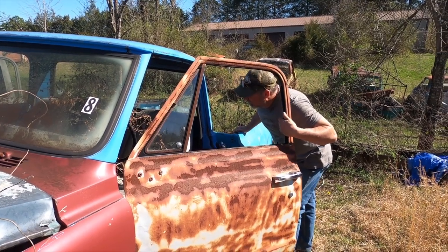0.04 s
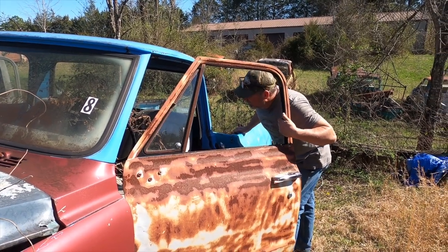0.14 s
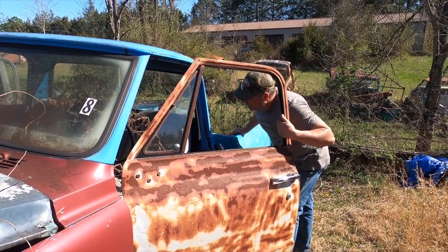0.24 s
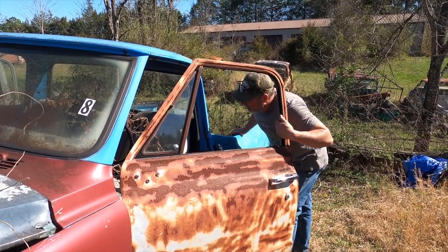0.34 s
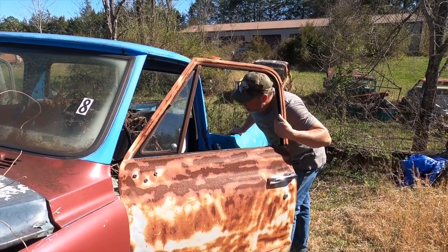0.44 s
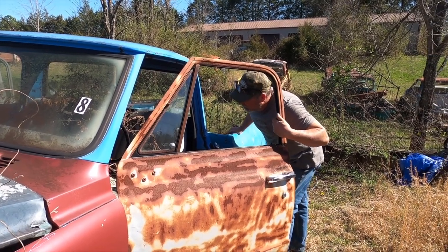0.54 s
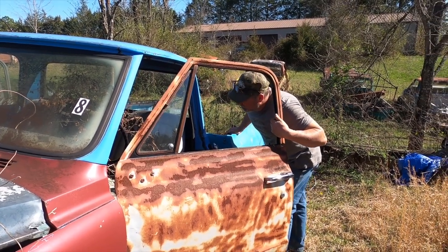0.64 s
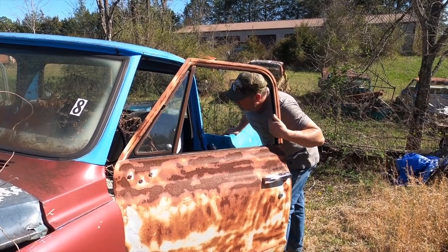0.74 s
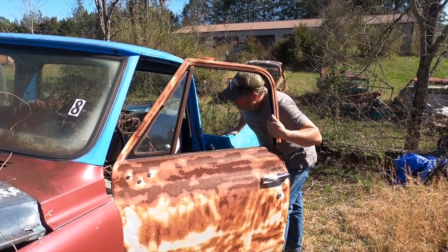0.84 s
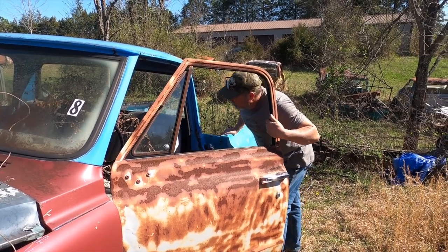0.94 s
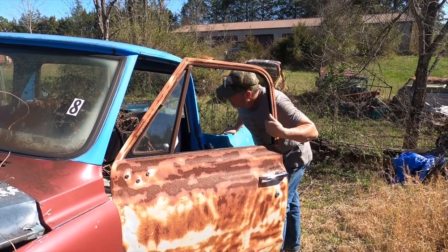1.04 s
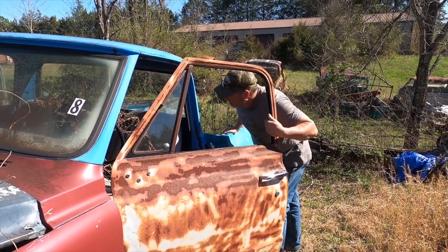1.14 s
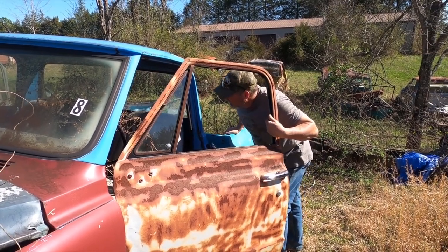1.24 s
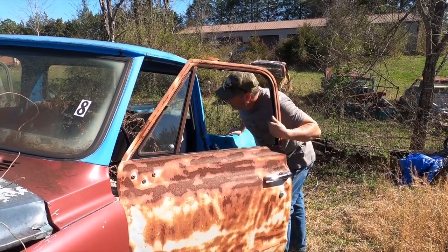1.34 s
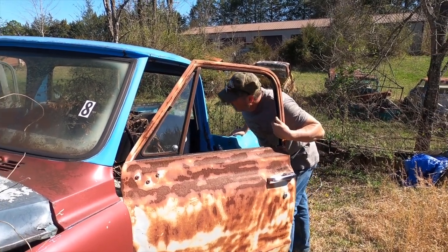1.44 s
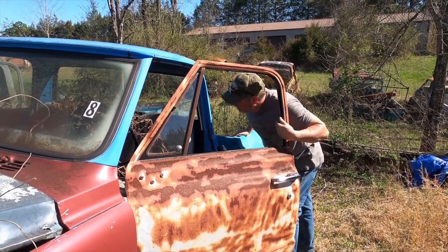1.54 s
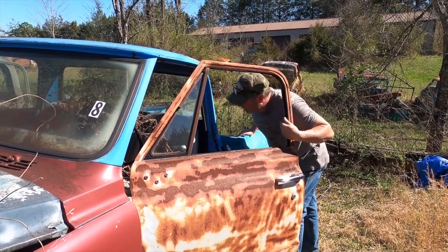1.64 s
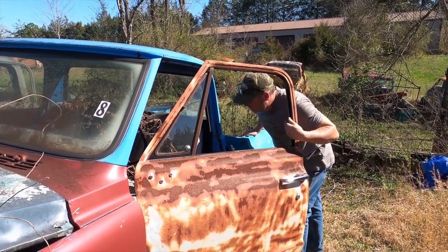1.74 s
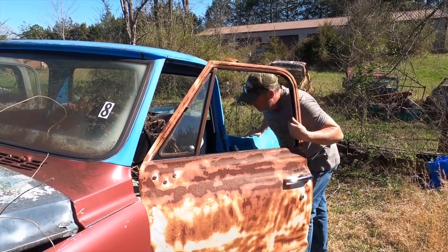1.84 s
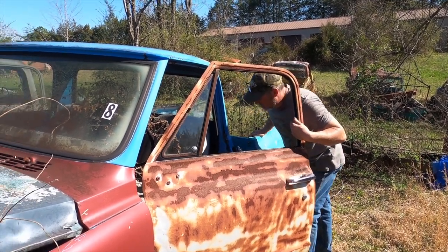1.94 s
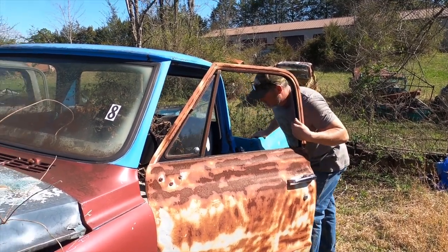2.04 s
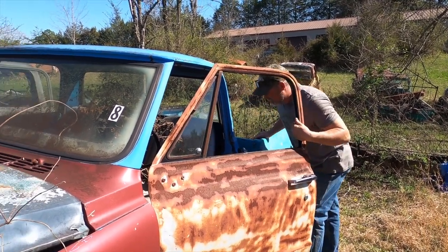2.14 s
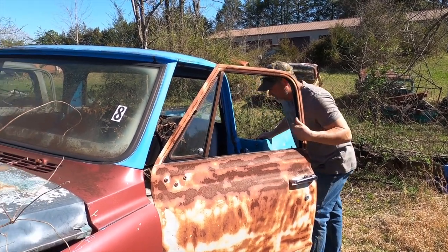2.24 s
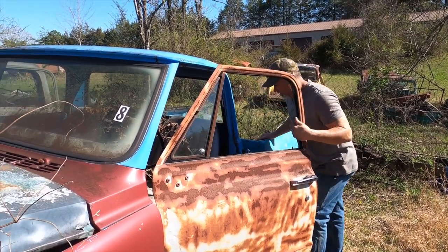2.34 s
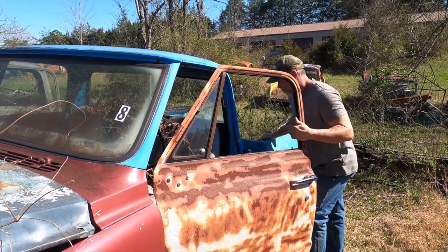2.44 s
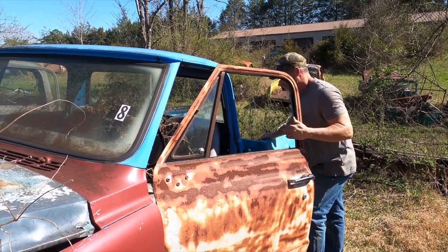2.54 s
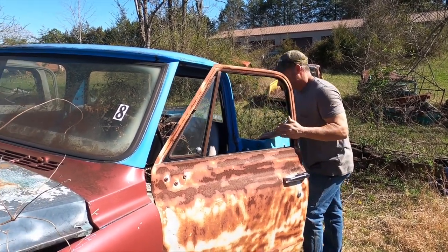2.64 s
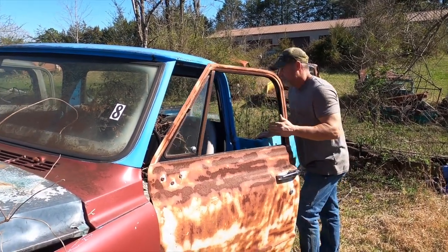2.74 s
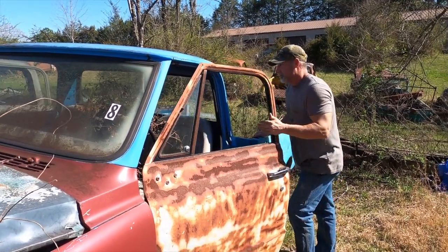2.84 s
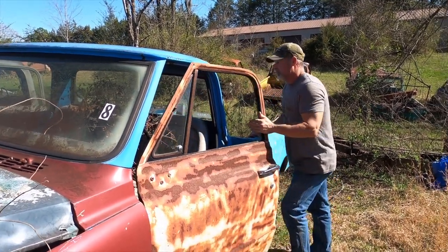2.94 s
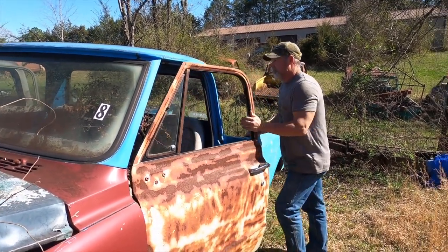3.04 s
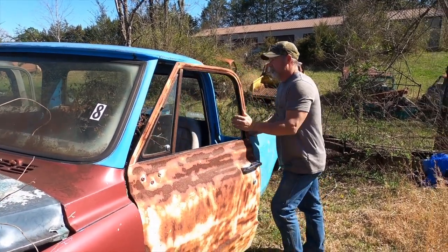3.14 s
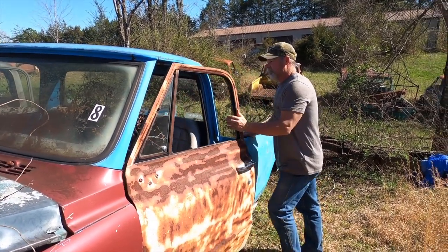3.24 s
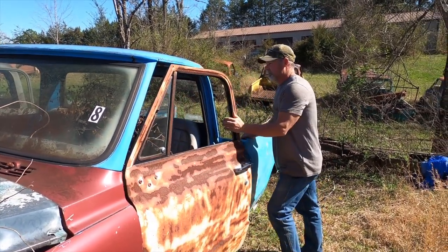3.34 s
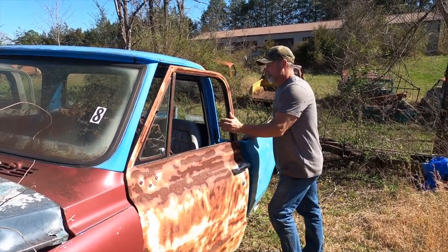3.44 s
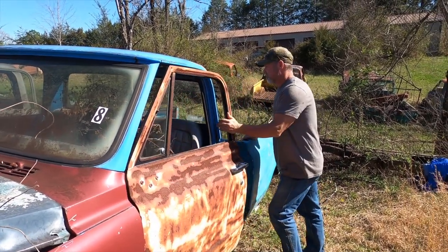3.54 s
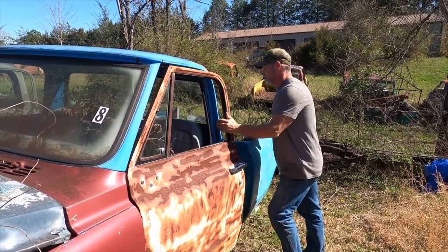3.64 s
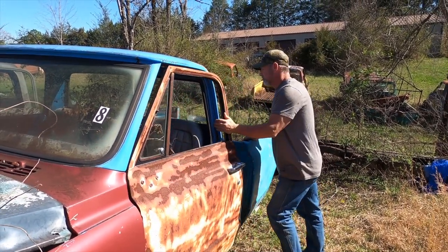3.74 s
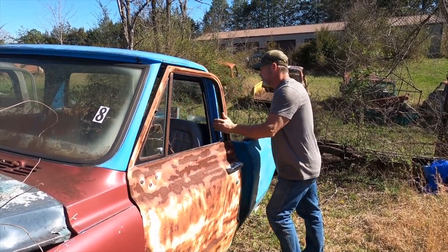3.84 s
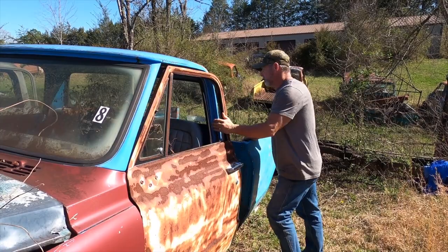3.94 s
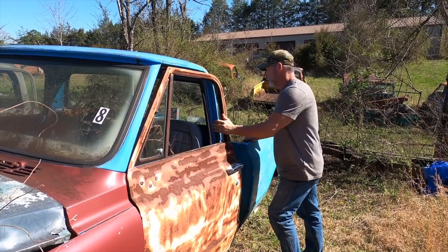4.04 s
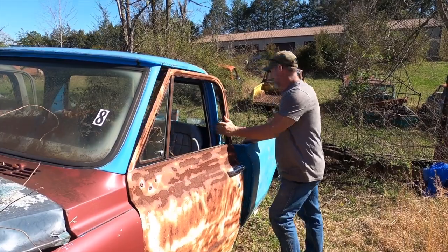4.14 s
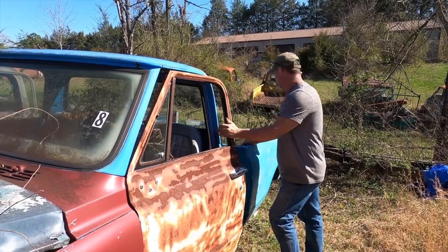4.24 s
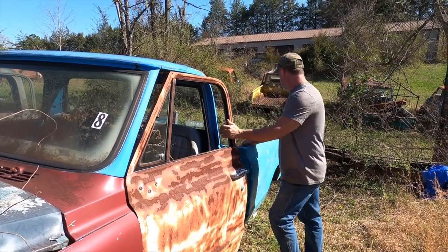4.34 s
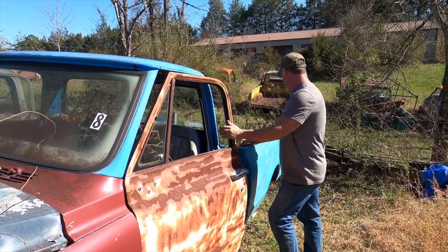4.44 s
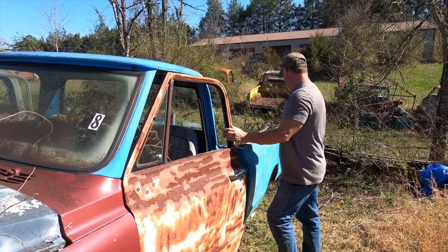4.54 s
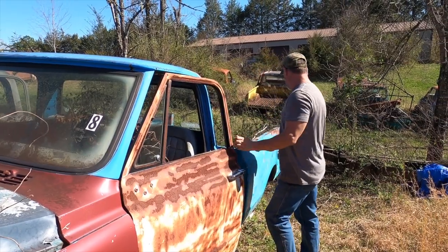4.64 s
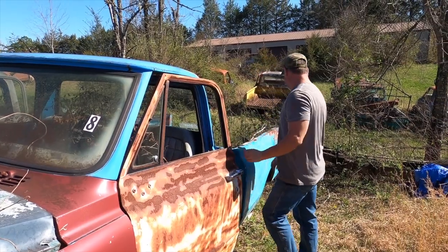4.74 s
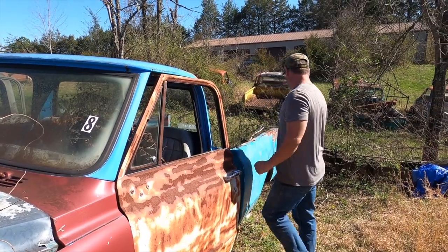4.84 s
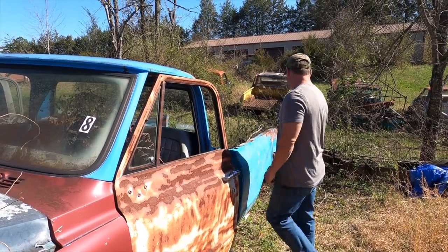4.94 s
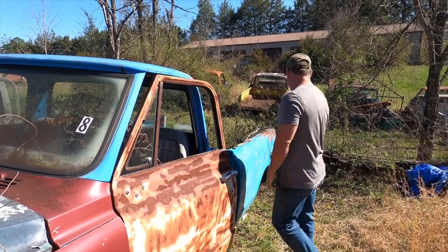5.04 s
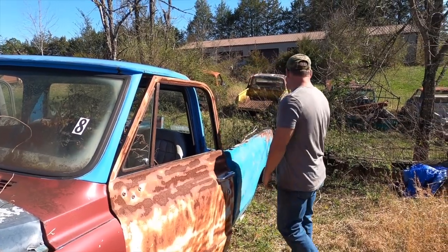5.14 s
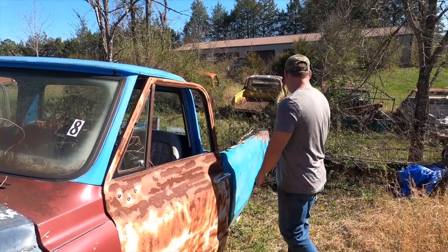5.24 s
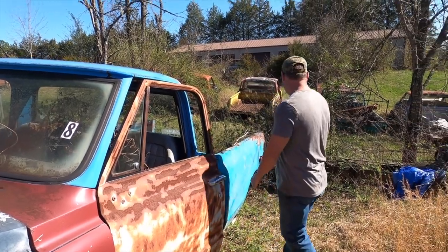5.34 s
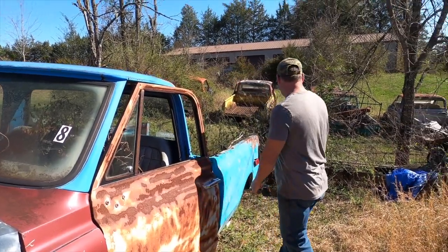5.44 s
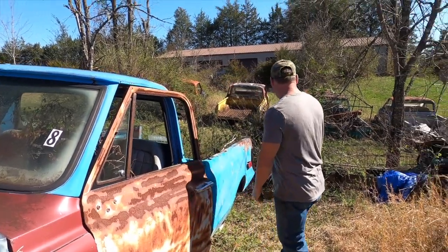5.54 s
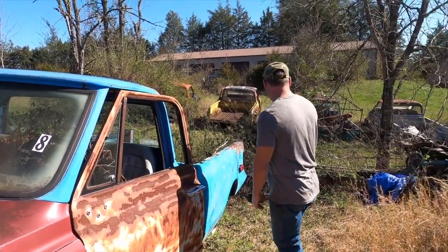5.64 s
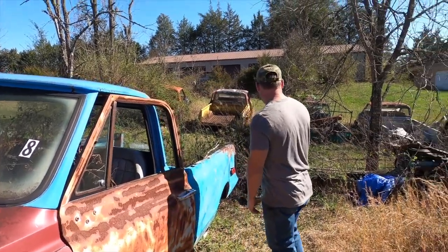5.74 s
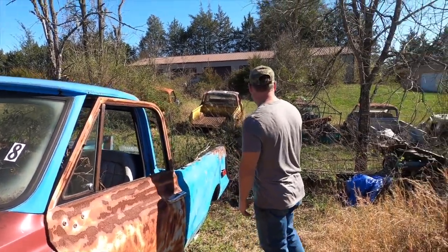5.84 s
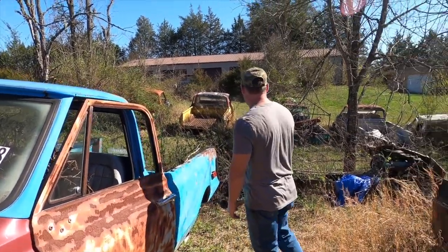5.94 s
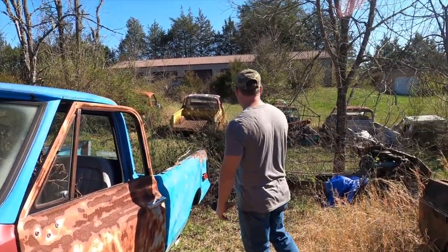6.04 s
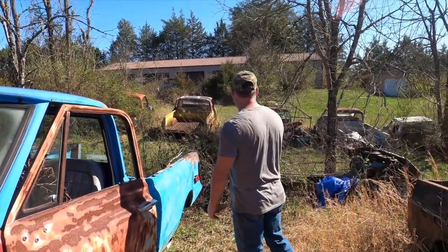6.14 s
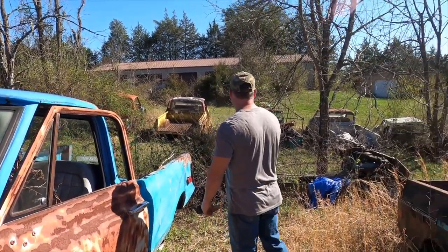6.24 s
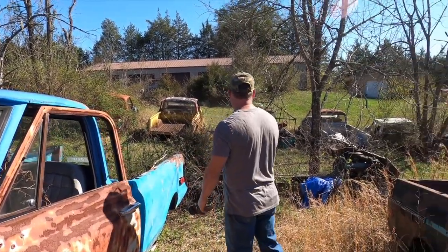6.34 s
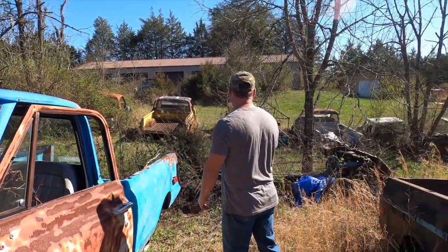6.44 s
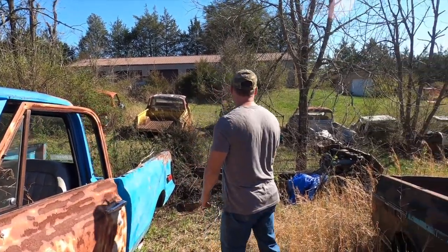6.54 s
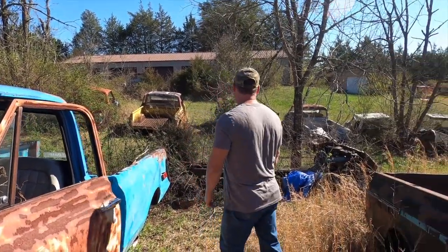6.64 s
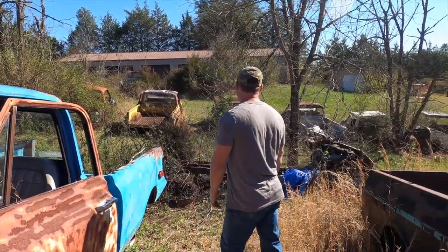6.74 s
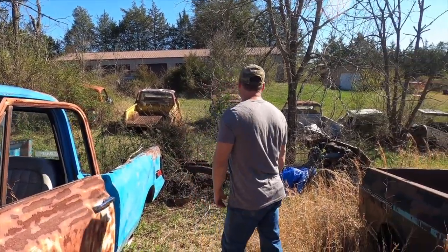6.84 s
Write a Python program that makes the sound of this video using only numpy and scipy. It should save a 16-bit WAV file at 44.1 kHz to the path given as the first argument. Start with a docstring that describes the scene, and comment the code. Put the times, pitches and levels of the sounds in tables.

```python
"""Rusty truck door in an overgrown yard

Wind rumbles on the microphone and an engine throbs far off: shaped noise, and harmonics that beat.
Low tones glide and moan; dry grass swishes: patchy noise, crackling ticks and single snaps.
A piece of metal clanks in the cab, the hinge groans in gliding tones, then a rusty steel door bumps
its frame, slams and rattles: each blow excites decaying modes. A faint whistle and hiss are filtered noise."""
import sys
import numpy as np
from scipy import signal
from scipy.fft import rfft, irfft
from scipy.io import wavfile
from scipy.ndimage import uniform_filter1d

SR = 44100
rng = np.random.default_rng(int(sys.argv[2]) if len(sys.argv) > 2 else 0)


def dump(signal):
    """Clip the signal to [-1, 1] and save it as 16-bit WAV at the path in sys.argv[1]."""
    limited = np.clip(np.atleast_2d(signal).T, -1, 1)
    pcm = np.round(limited * 32767).astype(np.int16)
    wavfile.write(sys.argv[1], SR, pcm)


N = 304290
T = np.arange(N) / SR


def amp(db):
    """Decibel law: a level in dB becomes an amplitude ratio."""
    return 10 ** (np.asarray(db) / 20)


def unit_rms(x):
    """Normalization: scales a signal to a root mean square of one."""
    return x / np.sqrt(np.mean(x ** 2) + 1e-20)


def read_curve(points, hz):
    """Logarithmic frequency scale: reads a curve of (Hz, value) between its points."""
    f, value = np.transpose(points)
    return np.interp(np.log(hz + 1), np.log(f + 1), value)


def columns(rows, t):
    """Linear interpolation: every column after the first (time) becomes a curve over t."""
    s, *rest = np.transpose(rows)
    return [np.interp(t, s, column) for column in rest]


def add(mix, start_s, sound):
    """Superposition: adds a sound to the mix in place, cut at the end."""
    part = mix[round(start_s * SR):][:len(sound)]
    part += sound[:len(part)]


def coloured(x, gain_db):
    """Linear filtering: multiplies the spectrum by a gain given as a function of Hz."""
    gain = amp(gain_db(np.fft.rfftfreq(len(x), 1 / SR)))
    return irfft(rfft(x) * gain, len(x))


def resonate(x, hz, width_hz):
    """Heterodyne resonance: shifts hz to zero, smooths twice by a pole of width_hz, and shifts back."""
    turn = np.exp(2j * np.pi * np.cumsum(hz * np.ones(len(x))) / SR)
    pole = np.exp(-np.pi * width_hz / SR)
    low = x / turn
    for _ in range(2):
        low = signal.lfilter([1 - pole], [1, -pole], low)
    return 2 * (turn * low).real


def field(level_db, length, size, patchy_db, drift_db=0.):
    """Short-time spectrum: noise shaped by level_db(Hz, s), with small patches and a slower drift of colour."""
    hop = size // 4
    t = np.arange(length // hop + 5) * hop / SR
    hz = np.fft.rfftfreq(size, 1 / SR)
    a, b, patches, drift = rng.standard_normal((len(t), len(hz), 4)).T
    patches = unit_rms(uniform_filter1d(uniform_filter1d(patches, size=6, axis=0), size=8, axis=1))
    drift = unit_rms(uniform_filter1d(uniform_filter1d(drift, size=8, axis=0), size=60, axis=1))
    z = (a + 1j * b) * amp(level_db(hz[:, None], t[None]) + patchy_db * patches + drift_db * drift)
    return signal.istft(z, nperseg=size, noverlap=size - hop)[1][:length]


def glide(start_s, length_s, db, first_hz, last_hz, waver_hz, ends_db):
    """Frequency modulation: a sliding tone, loudest in the middle, its pitch wavering by waver_hz rms."""
    u = np.arange(0, 1, 1 / (length_s * SR))
    waver = unit_rms(uniform_filter1d(rng.standard_normal(len(u)), size=800))
    hz = first_hz + (last_hz - first_hz) * u + waver_hz * waver
    swell = amp(db + ends_db * (2 * u - 1) ** 2) * signal.windows.tukey(len(u), .2)
    return start_s, np.sqrt(2) * swell * np.sin(2 * np.pi * np.cumsum(hz) / SR)


def swells(rows, t, rise_db_per_s, fall_db_per_s):
    """Energy summation, in dB, of swells (start s, length s, dB) that rise, hold for their length and fall."""
    s, length, db = np.transpose(rows)[:, :, None]
    before = (s - t) * rise_db_per_s
    after = (t - s - length) * fall_db_per_s
    below = np.maximum(np.maximum(before, after), 0)
    return 10 * np.log10((amp(db - below) ** 2).sum(0) + 1e-20)


# wind on the microphone: time [s], rumble_level [dB], roar_level [dB]
WIND = [(0.0, -20.5, -47.5), (0.19, -23, -47.5), (0.38, -22, -43), (0.68, -28, -48), (1.05, -22.5, -49.5),
        (1.95, -23, -50), (2.27, -23, -38), (2.4, -24.5, -44.5), (2.55, -21.5, -40), (2.85, -28, -45.5),
        (3.25, -25.5, -49.5), (3.8, -24.5, -48), (4.25, -26, -44), (4.6, -27, -49), (5.1, -27, -52),
        (5.5, -30, -48.5), (5.9, -27.5, -50), (6.34, -32, -53.5), (6.9, -40.5, -51)]
# relative spectrum of the rumble: frequency [Hz], density [dB per Hz]
RUMBLE = [(12, -57.5), (20, -16), (34, -30.5), (50, -11.5), (64, -9), (86, 0), (103, -2.5), (132, -15),
          (152, -16), (171, -33), (193, -29), (214, -34), (260, -44.5), (340, -74), (570, -120)]
# relative spectrum of the roar: frequency [Hz], density [dB per Hz]
ROAR = [(120, -27.5), (200, 10), (238, -19), (317, -1.5), (378, -11), (750, -19.5), (1270, -19.5),
        (1950, -36), (2250, -39.5), (4540, -55.5), (9000, -83), (11700, -85.5), (19800, -120)]


def wind():
    """Broadband flow noise: a low rumble under a faint roar."""
    rumble_db, roar_db = columns(WIND, T)
    rumble = field(lambda hz, t: read_curve(RUMBLE, hz) + 0 * t, N, size=4096, patchy_db=1.9)
    roar = field(lambda hz, t: read_curve(ROAR, hz) + 0 * t, N, size=1024, patchy_db=2.0)
    return amp(rumble_db) * unit_rms(rumble) + amp(roar_db) * unit_rms(roar)


# low gliding moans, perhaps an engine revving far off:
# start [s], length [s], level at the middle [dB], first_pitch [Hz], last_pitch [Hz]
LOW_MOANS = [(0.122, 0.27, -20, 95.3, 133.1), (2.239, 0.28, -18.5, 96.5, 138),
             (5.945, 0.391, -24, 125.6, 71), (6.5, 0.49, -50, 200.3, 215)]


def low_moans():
    """Gliding oscillation: low moans slide in pitch, perhaps an engine revving far off."""
    out = np.zeros(N)
    for row in LOW_MOANS:
        add(out, *glide(*row, waver_hz=5.2, ends_db=-24.5))
    return out


# an engine idles some way off: time [s], level [dB]
ENGINE = [(0, -41), (.6, -39.5), (.95, -26), (1.8, -27.5), (2.3, -29), (2.8, -36), (3.3, -23), (4.2, -25.5),
          (4.7, -23.5), (5.4, -22), (5.9, -20.5), (6.3, -34.5), (6.9, -46)]
# its harmonics: order [multiple of the cycle rate], relative level [dB]
ORDERS_DB = [(5, -19), (7, -13), (8, -16), (9, -9), (10, 0), (11, 0), (12, -11), (13, -11), (14, -14),
             (15, -13), (16, -15)]
CYCLES_PER_S, THROB_AT_S = 8.0, 5.324
WANDER_RAD, WANDER_DB = 0.28, 3  # rms drift of each harmonic
SMEAR_RAD = .7  # phase spread, times the squared distance from the mean order


def engine():
    """Beating of harmonics: multiples of a slow cycle form a soft throb, each wandering a little."""
    order, db = np.transpose(ORDERS_DB)[:, :, None]
    t, slow = T[::20], T[::1000]
    drift = uniform_filter1d(rng.standard_normal((2, len(order), len(slow))), size=14, axis=2)
    turn, swell = np.array([[np.interp(t, slow, unit_rms(row)) for row in rows] for rows in drift])
    phase = 2 * np.pi * order * CYCLES_PER_S * (t - THROB_AT_S)
    phase += SMEAR_RAD * (order - order.mean()) ** 2 + WANDER_RAD * turn
    harmonics = amp(db + WANDER_DB * swell) * np.cos(phase)
    tones = signal.resample_poly(harmonics.sum(0), 20, 1)[:N]
    return amp(columns(ENGINE, T)[0]) * unit_rms(tones)


# the grass stirs faintly all the time: time [s], level [dB]
STIR = [(0, -87), (1.0, -91), (1.2, -69), (1.5, -85), (2.0, -87.5), (2.4, -76), (2.75, -75), (3.15, -68.5),
        (3.45, -71.5), (3.75, -76), (4.3, -69), (4.7, -73), (6.9, -62.5)]
# legs drag through the grass: start [s], length [s], level [dB]
STRIDES = [(4.77, .08, -58.5), (4.87, .12, -57), (5.08, 0.4, -54.5), (5.57, 0.1, -60), (5.7, .31, -56.5),
           (6.1, .19, -54.5), (6.36, .42, -55)]
# short rustles in the grass, and later the crunches of footfalls: time [s], level [dB]
RUSTLES = [(.04, -73.5), (.13, -73), (.18, -74), (0.271, -70), (0.921, -69.5), (1.012, -73.5), (1.16, -66),
           (1.51, -76), (1.57, -73), (1.86, -71), (2.041, -64.5), (2.411, -71), (2.798, -69), (2.87, -68),
           (4.341, -66.5), (4.531, -60), (4.8, -53.5), (5.12, -52), (5.42, -52), (5.52, -54), (5.81, -55),
           (5.991, -57), (6.26, -54), (6.595, -52), (6.62, -47), (6.642, -51.5), (6.668, -49),
           (6.86, -57.5)]


def grass_db(t):
    """Energy summation: the powers of faint stirring, strides, short rustles and footfalls add up."""
    strides = swells(STRIDES, t, rise_db_per_s=156.5, fall_db_per_s=197)
    rustle_rows = [(s, 0, db) for s, db in RUSTLES]
    rustles = swells(rustle_rows, t, rise_db_per_s=396, fall_db_per_s=497)
    return 10 * np.log10(amp(columns(STIR, t)[0]) ** 2 + amp(strides) ** 2 + amp(rustles) ** 2)


# relative spectrum of the swish: frequency [Hz], density [dB per Hz]
SWISH = [(530, -23), (900, -1), (1130, -8), (1430, -7.5), (2150, -11.5), (2450, -11.5), (3400, -12),
         (3950, -10), (4500, -12.5), (5000, -12), (6000, -14.5), (7680, -15.5), (8550, -12.5), (9510, -18),
         (12200, -20.5), (15500, -33.5)]
# pitches of small stalks: pitch [Hz]
CRACKLE_HZ = [1500, 2350, 3030, 4000, 4950, 5970, 8450, 10500, 12300]
# stalks that snap: start [s], level [dB], pitch [Hz]
SNAPS = [(1.148, -66, 3780), (1.8497, -71, 3700), (2.022, -63.5, 4240), (2.042, -57, 3700),
         (3.296, -56, 3510), (4.339, -49, 4830), (4.3977, -65, 3500), (5.0754, -43, 5820),
         (5.119, -33.5, 2450), (5.208, -51, 4070), (5.425, -44, 3700), (5.469, -45, 4950),
         (5.684, -52, 4530), (5.7915, -46, 6550), (6.4712, -42, 5350), (6.585, -42, 4600),
         (6.5934, -32, 4900), (6.603, -41, 4300), (6.613, -25.5, 4670), (6.625, -36, 5170),
         (6.6388, -28, 4500), (6.647, -39, 3200), (6.655, -22.5, 4840), (6.665, -39, 4300),
         (6.7171, -35, 4100), (6.786, -39, 4540), (6.857, -37, 4400)]
SNAP_T60_S = 0.015
CRACKLE_DB, CRACKLE_PER_DB = -4, 0.14  # share of crackle at -52 dB; softer grass crackles less


def random_ticks(spread_db, ticks_per_s):
    """Poisson-like impulses: sparse random ticks of exponentially spread level."""
    return amp(spread_db * np.minimum(rng.exponential(1, N), 5)) * (rng.random(N) < ticks_per_s / SR)


def grass():
    """Friction noise and brittle fracture: a patchy swish, duller when soft, with crackle and single snaps."""
    slow = T[::64]
    level_db = grass_db(slow)

    def swish_db(hz, t):
        now_db = np.interp(t, slow, level_db)
        dull = 0.78 * np.minimum(now_db + 51.5, 0) * np.log2(np.maximum(hz, 6000.) / 5600.0)
        # the low part swells less
        steady = -.8 * np.maximum(now_db + 55.0, 0) / (1 + (hz / 920.0) ** 6)
        return read_curve(SWISH, hz) + dull + steady

    swish = unit_rms(field(swish_db, N, size=512, patchy_db=2.0, drift_db=2.0))
    ticks = random_ticks(4.1, 1500.) * rng.choice([-1, 1], N)
    stalk = rng.integers(0, len(CRACKLE_HZ), N)
    crackle = np.zeros(N)
    for k, hz in enumerate(CRACKLE_HZ):
        crackle += amp(read_curve(SWISH, hz)) * resonate(ticks * (stalk == k), hz, 970.0)
    crackle = unit_rms(crackle)
    # the finest stalks tick
    crackle += amp(-13.5) * unit_rms(resonate(random_ticks(4.5, 400.), 9600.0, 5000.))
    now_db = np.interp(T, slow, level_db)
    out = amp(now_db) * (swish + amp(CRACKLE_DB + CRACKLE_PER_DB * (now_db + 52.0)) * crackle)
    t = T[:4000]
    for s, db, hz in SNAPS:
        noise = rng.standard_normal(len(t))
        snap = unit_rms(resonate(noise, hz, 1200.0))
        snap += amp(-9.5) * coloured(noise, lambda f: -2.5 * f / 1000)
        add(out, s, amp(db - 60 * t / SNAP_T60_S) * snap * (1 - np.exp(-t / 0.0015)))
    return out


# a fuzzy whistle swells now and then: start [s], length [s], level [dB], pitch [Hz]
WHISTLES = [(4.688, 0.14, -61, 1440), (5.104, 0.015, -52.5, 1430), (5.227, .02, -57, 1390),
            (5.37, 0.08, -56, 1564), (5.759, 0.024, -55.5, 1410), (5.898, 0.089, -60, 1500),
            (6.245, 0.079, -55.5, 1410), (6.695, 0.062, -54, 1480), (6.784, 0.11, -54, 1385)]
WHISTLE_FLOOR_DB = -68.5


def whistle():
    """Narrow-band resonance: noise in one resonance that swells and shifts a little."""
    out = np.zeros(N)
    s, length, db, hz = np.transpose(WHISTLES)
    t = T[T >= s[0] - .1]
    swell_db = swells(np.transpose([s, length, db]), t, rise_db_per_s=196, fall_db_per_s=178)
    level = amp(swell_db) + amp(WHISTLE_FLOOR_DB)
    pitch_hz = np.interp(t, s + length / 2, hz)
    tone = resonate(rng.standard_normal(len(t)), pitch_hz, width_hz=270)
    add(out, t[0], level * unit_rms(tone))
    return out


# a faint narrow hiss comes and goes, one list a swell: time [s], level [dB], pitch [Hz]
HISS = [
    [(3.45, -82, 1980), (3.56, -63.5, 2080), (3.66, -61.5, 1950), (3.76, -58.5, 1820), (3.88, -54.5, 1800)],
    [(4.16, -67, 2050), (4.25, -61, 2020), (4.35, -61, 1870), (4.45, -68, 1770), (4.52, -62, 1880),
     (4.6, -74, 1810)],
    [(6.68, -76, 1990), (6.76, -63, 1975), (6.9, -57, 1940)],
]


def hiss():
    """Time-varying filtering: noise in a moving resonance with a wide skirt below it."""
    out = np.zeros(N)
    for rows in HISS:
        t = np.arange(rows[0][0], rows[-1][0], 1 / SR)
        db, hz = columns(rows, t)
        noise = rng.standard_normal(len(t))
        skirt = amp(-4.0) * resonate(noise, .8 * hz, 500.)
        add(out, t[0], amp(db) * unit_rms(resonate(noise, hz, 280.0) + skirt))
    return out


def struck(modes, skin, t60s, colour, damping, contact_s, ring_db, size):
    """Modal superposition: one blow rings single modes, and dense modes of the skin die band by band."""
    t = T[:size]
    hz, db, t60 = np.transpose(modes)[:, :, None]
    decay_db = -60 * t / (t60 * damping)
    rings = amp(db + colour(hz) + decay_db) * np.sin(2 * np.pi * (hz * t + rng.random(hz.shape)))
    f = np.fft.rfftfreq(len(t), 1 / SR)
    centres = 125 * 2. ** np.arange(8)[:, None]
    shares = np.maximum(1 - abs(np.log2((f + 1) / centres)), 0)  # overlapping octave bands
    spectrum = amp(read_curve(skin, f) + colour(f)) * rfft(rng.standard_normal(len(t)))
    bands = irfft(shares * spectrum, len(t))
    dense = (bands * amp(-60 * t / (read_curve(t60s, centres) * damping))).sum(0)
    # loose parts chatter
    dense *= amp(1.3 * unit_rms(uniform_filter1d(rng.standard_normal(len(t)), size=200)))
    return (dense + amp(ring_db) * rings.sum(0)) * (1 - np.exp(-t / contact_s))


# a piece of metal clanks in the cab and rattles on: start [s], strength [dB], single_modes [dB]
CLANKS = [(2.118, -38, -23.5), (2.131, -36, -25.5), (2.138, -28.5, -27), (2.147, -24.5, -29),
          (2.155, -5.5, -25.5), (2.159, -4, -14.5), (2.164, -12.5, -15.5), (2.171, -11, -19.5),
          (2.176, -13.5, -15), (2.183, -22.5, -19), (2.192, -26, -14.5), (2.203, -31, -22),
          (2.215, -30, -19), (2.229, -34.5, -20), (2.243, -37, -17), (2.258, -41, -20), (2.27, -42, -20),
          (2.281, -35, -24), (2.300, -39.5, -24), (2.334, -44, -12)]
# single modes of the piece: frequency [Hz], level [dB], t60 before the damping factor [s]
PIECE = [(352, -12, 0.07), (686, 3.5, 0.14), (985, -8.5, 0.088), (1220, -9, 0.073), (1520, -3.5, 0.14),
         (2946, -6, 0.056), (3316, -2.5, .05), (3600, -4, 0.05), (3780, 1.5, 0.082), (3810, 0, 0.087),
         (7000, -16, .06)]
# dense ringing of the piece: frequency [Hz], density [dB per Hz]
CLATTER = [(120, -17.5), (220, -6), (345, -2.5), (515, -17.5), (690, -3), (1000, -8), (1510, -11),
           (2300, -11), (3300, -12.5), (3850, -6.5), (4200, -16.5), (6300, -21.5), (7000, -18.5),
           (9300, -32), (10800, -29.5), (14000, -39), (15500, -47)]
# its decay: frequency [Hz], t60 before the damping factor [s]
CLATTER_T60 = [(300, 0.53), (1000, 0.28), (2000, 0.18), (10000, 0.12)]


def clank():
    """Repeated impact: loose metal rings bright and is quickly damped."""
    out = np.zeros(N)
    for s, db, ring_db in CLANKS:
        blow = struck(PIECE, CLATTER, CLATTER_T60, np.zeros_like, damping=0.6, contact_s=0.0019,
                      ring_db=ring_db, size=10000)
        add(out, s, amp(db) * blow)
    return out


# groans of the hinge: start [s], length [s], level at the middle [dB], first_pitch [Hz], last_pitch [Hz]
GROANS = [(0.296, 0.2, -47.5, 319.5, 323), (2.098, 0.062, -33.5, 221, 225), (2.481, 0.095, -43.5, 315, 311),
          (2.92, .14, -36, 281.6, 210)]


def hinge():
    """Gliding oscillation: short groans whose pitch slides and wavers."""
    out = np.zeros(N)
    for row in GROANS:
        add(out, *glide(*row, waver_hz=1.5, ends_db=-17.0))
    return out


# blows on the door: start [s], strength [dB], boom [dB], tilt above 1.5 kHz [dB per octave],
# damping [factor on t60], jingle of loose parts [dB]
BLOWS = [(3.447, -6, -27.5, -13.5, 0.43, 9.5), (3.465, -16.5, -17, -17, 0.39, 1),
         (3.514, -13, -15, -18, 0.5, 5), (3.562, -5.5, -17, -19, 0.27, 4),
         (3.573, -17, -15, -16, 0.23, -1.5), (3.617, -12.5, -15, -15, 0.43, 1),
         (3.625, -13.5, -15, -14.5, 0.45, -1), (3.886, 13, -16, -2, 0.23, -1.5), (3.897, -2, 4, 3, 0.7, 4),
         (3.905, 7, 5, -7, 0.52, -8), (3.922, -7, 4, 4, 0.3, -1), (3.9351, 5, -1.5, 4, 0.28, 1),
         (3.940, 2.5, -5, 3, 0.26, -1), (3.947, 2, -8, 3, 0.29, 2), (3.956, -3.5, -3, 2, 0.28, 0),
         (3.968, 0.5, 11, -1, 0.37, -3), (3.984, -8.5, 3.5, -5.5, 0.27, 12),
         (3.998, -14.5, 4, 0, 0.69, 12.5), (4.013, -18.5, 0, -0.5, .5, 10),
         (4.030, -11.5, -9, 1.8, 0.42, -0.5), (4.041, -9, -2, 0, 0.3, 9), (4.055, -13.5, 17, -4.5, 0.38, 5),
         (4.071, -23.5, 3, 1, .5, 9), (4.089, -19, 12, 1.5, 0.4, 0), (4.101, -18, -0.5, 1, 0.43, 7),
         (4.111, -17, -14, 1, 0.27, 4), (4.128, -24, -4.5, -1, .4, 8), (4.147, -15.5, -1, 0, 0.28, -2),
         (4.160, -20, 0.5, 2, 0.44, 3), (4.171, -16, 7.5, -8, 0.68, 7), (4.223, -31.5, 1, -1.5, 0.67, 11.5)]
# single modes of the door: frequency [Hz], level [dB], t60 before the damping factor [s]
DOOR = [(187.6, -5, 0.74), (225, 4.5, 0.27), (258.8, 1, 0.52), (308.4, -2, 0.41), (352, -7, 0.23),
        (394.5, -7, 0.59), (439, -7, 0.46), (594, -15, 0.23), (689, -11, .5), (773.5, -10, 0.6),
        (840, -11.5, 0.49), (946, -16.5, .3), (1020, -10, 0.25), (1090, -18, 0.24), (1240, -13, 0.27),
        (1373, -17, 0.44), (1440, -24.5, 1), (1670, -24.5, 0.12), (2240, -26.5, 0.18), (3700, -26.5, 0.15)]
# dense ringing of the sheet: frequency [Hz], density [dB per Hz]
SKIN = [(71, -46.5), (120, -13.5), (138, -7.5), (265, -6.5), (367, -9), (450, -10.5), (520, -19.5),
        (796, -11.5), (1410, -17.5), (1720, -20), (2200, -23.5), (3170, -29.5), (8590, -48), (15500, -71)]
# its decay: frequency [Hz], t60 before the damping factor [s]
SKIN_T60 = [(150, 0.91), (500, 0.75), (1500, 0.32), (4000, 0.34), (10000, 0.11)]
# the hollow door and the air in the cab answer the slam:
# start [s], level before rise and decay [dB], pitch [Hz], t60 [s], rise [s]
THUMPS = [(3.8880, 10.5, 342, 0.032, 0.0044), (3.890, -3, 205, 0.05, .002), (3.901, -1, 49.9, 0.2, 0.0049),
          (3.925, -1.5, 60, .13, .008), (3.955, -13, 262.5, 0.17, 0.01), (3.985, -15, 45.7, 0.7, 0.009),
          (3.962, -16.5, 30, 1, 0.02)]
JINGLE_HZ, JINGLE_WIDTH_HZ = 3700, 360
RING_DB, RING_PER_DULL = -23.5, .8  # share of the single modes; soft, dull bumps ring clearer
CONTACT_S, HARDENS_AT_DB = 0.0023, 8  # contact of a soft blow, halved at this strength


def door():
    """Impact excitation of a plate and cavity: bumps, slam and rattles on one steel door, and thumps."""
    out, t = np.zeros(N), T[:SR]
    for s, db, boom_db, tilt_db, damping, jingle_db in BLOWS:
        def colour(hz):
            boom = boom_db / (1 + (hz / 324.0) ** 4)
            tilt = tilt_db * np.log2(np.maximum(hz, 1500.) / 1100.0)
            jingle = jingle_db * np.exp(-((hz - JINGLE_HZ) / JINGLE_WIDTH_HZ) ** 2)
            return boom + tilt + jingle
        ring_db = RING_DB + RING_PER_DULL * max(-tilt_db - 8.5, 0)
        contact_s = CONTACT_S / (1 + amp(db - HARDENS_AT_DB) ** 2)
        blow = struck(DOOR, SKIN, SKIN_T60, colour, damping, contact_s, ring_db, size=20000)
        add(out, s, amp(db) * blow)
    for s, db, hz, t60, rise_s in THUMPS:
        thump = amp(db - 60 * t / t60) * np.sin(2 * np.pi * hz * t)
        add(out, s, thump * (1 - np.exp(-t / rise_s)))
    return out


def scene():
    """Superposition: all sources add up in one channel."""
    background = wind() + low_moans() + engine() + grass() + whistle() + hiss()
    return (background + clank() + hinge() + door())[None]


def record(dry):
    """Saturation and band limiting: peaks overload the input, then a low-pass removes the top."""
    clipped = np.clip(dry, -1, 1)
    low_pass = signal.firwin(511, 15700, window=("kaiser", 9), fs=SR)  # edge in Hz
    return signal.oaconvolve(clipped, low_pass[None], "same")


dry = scene()
out = record(dry)
dump(out)
```